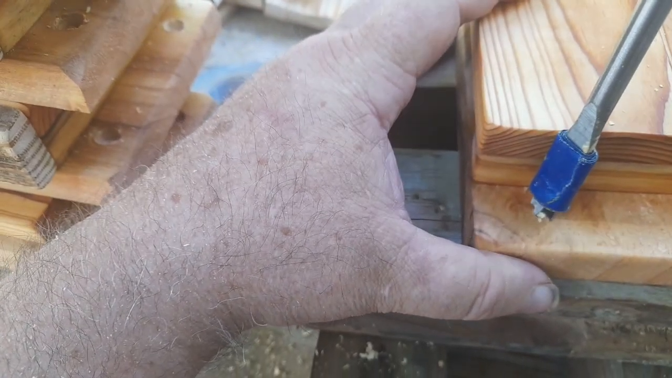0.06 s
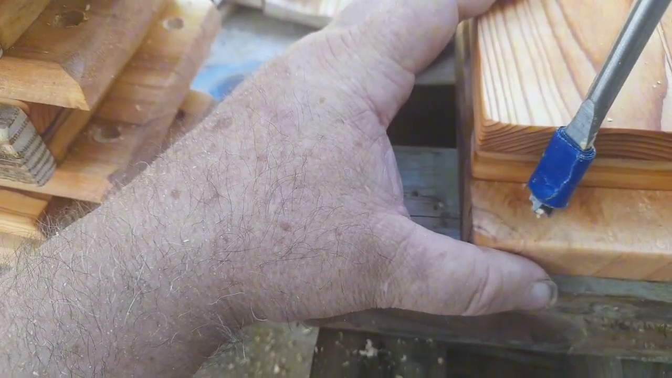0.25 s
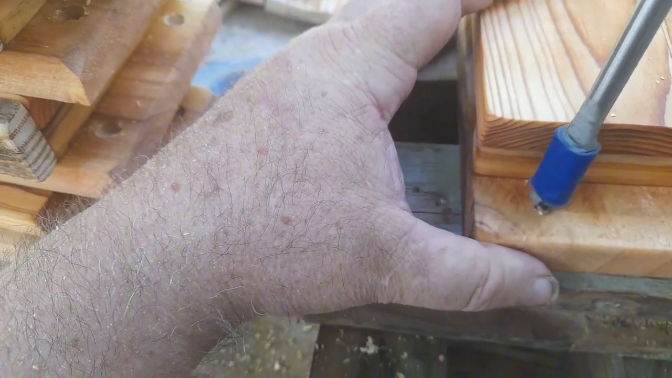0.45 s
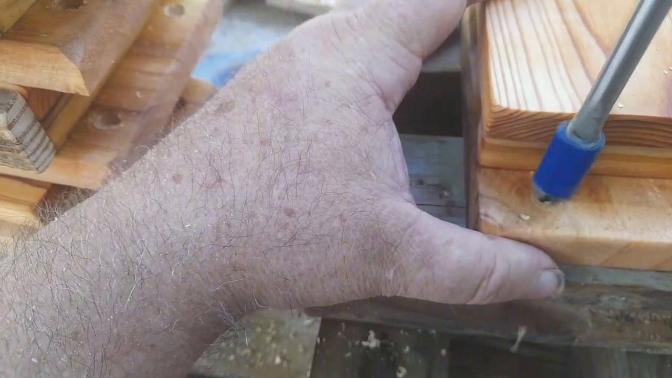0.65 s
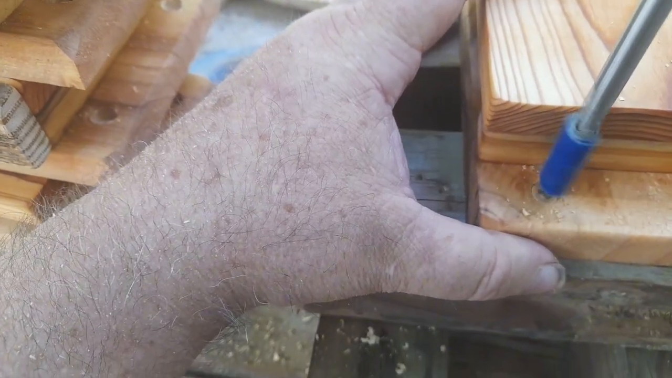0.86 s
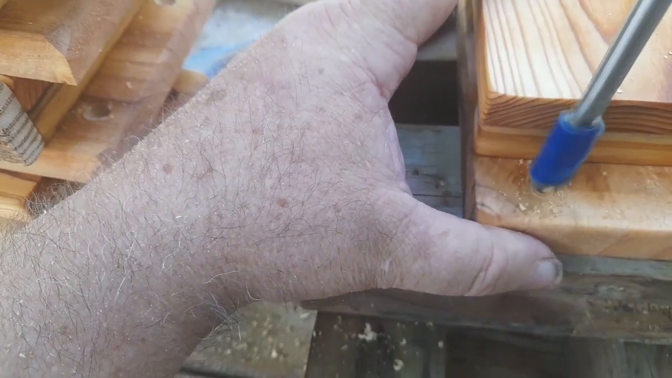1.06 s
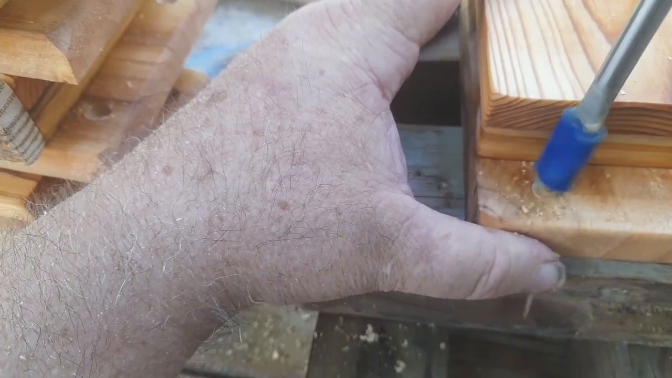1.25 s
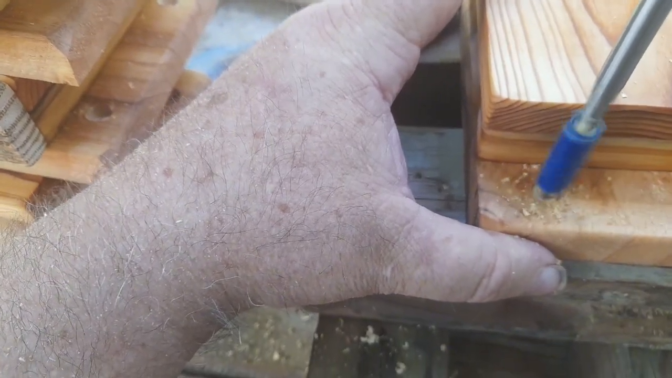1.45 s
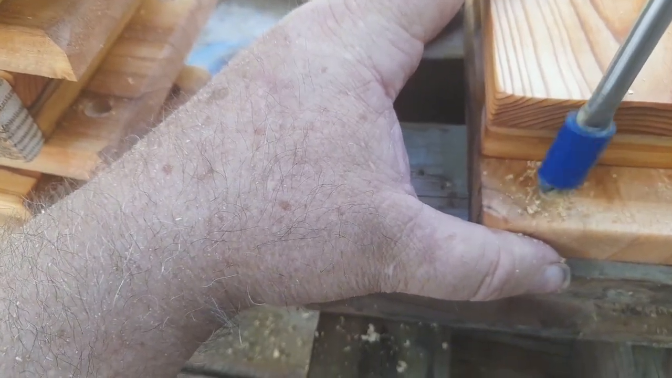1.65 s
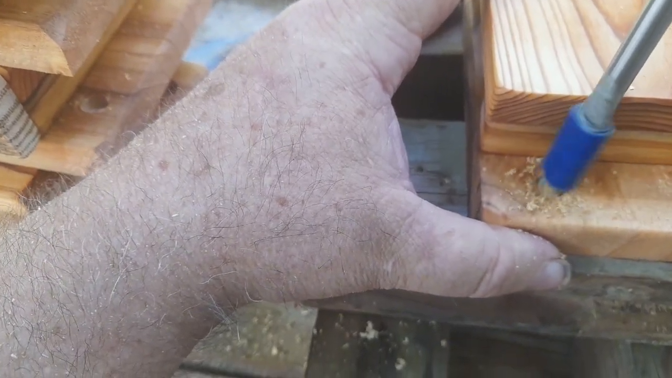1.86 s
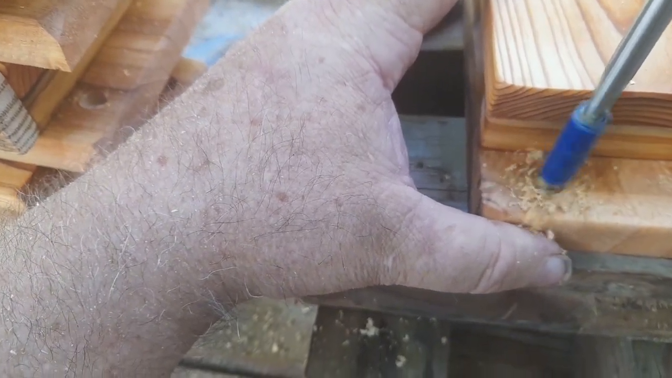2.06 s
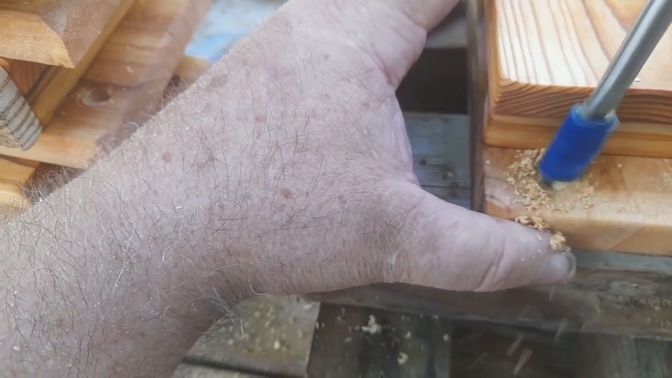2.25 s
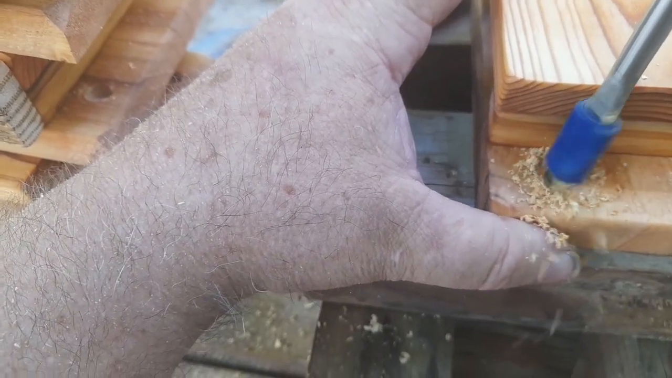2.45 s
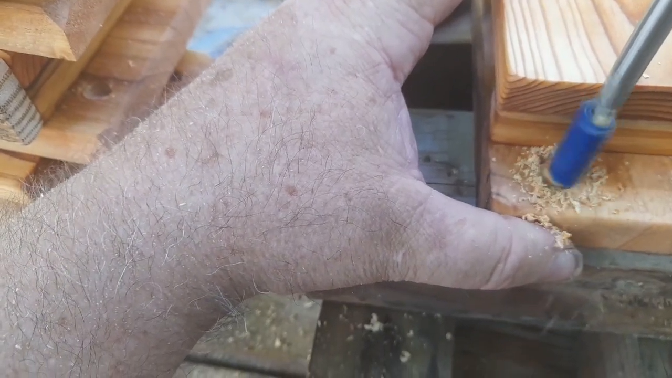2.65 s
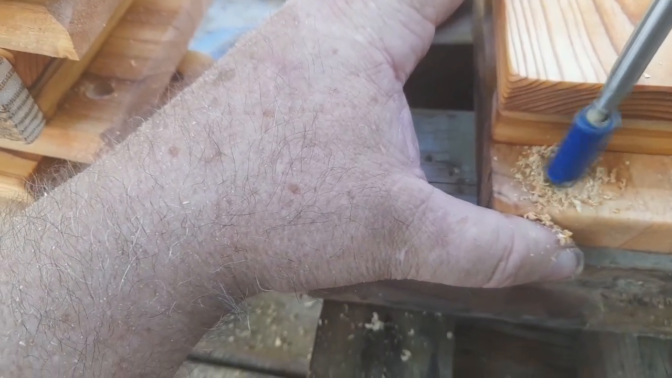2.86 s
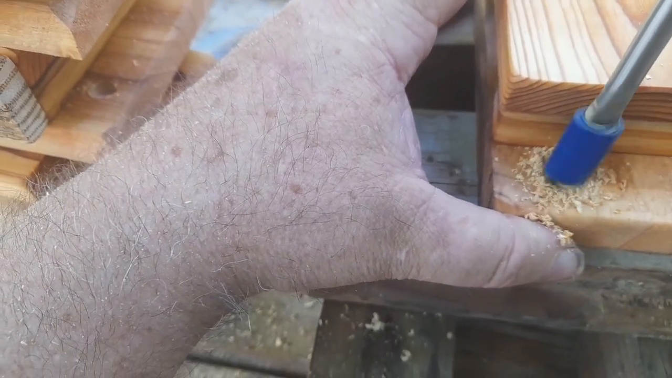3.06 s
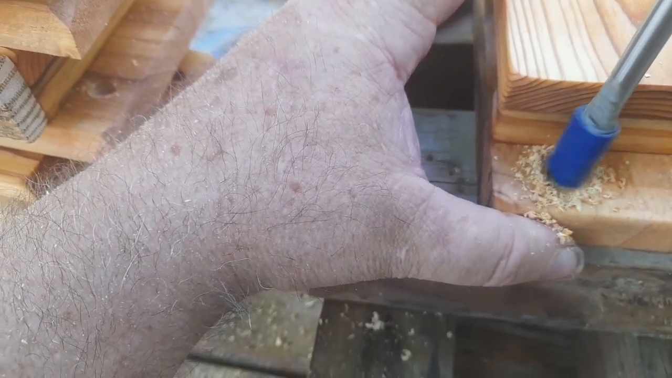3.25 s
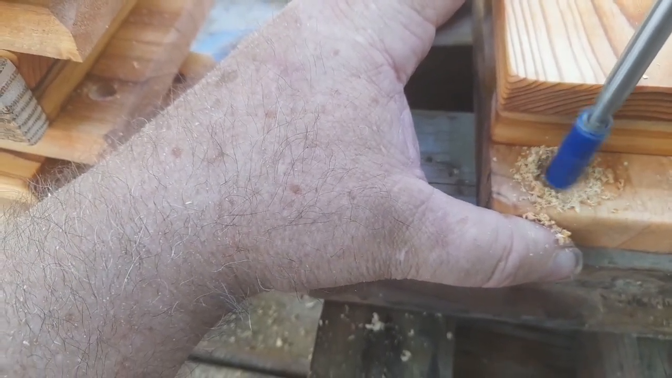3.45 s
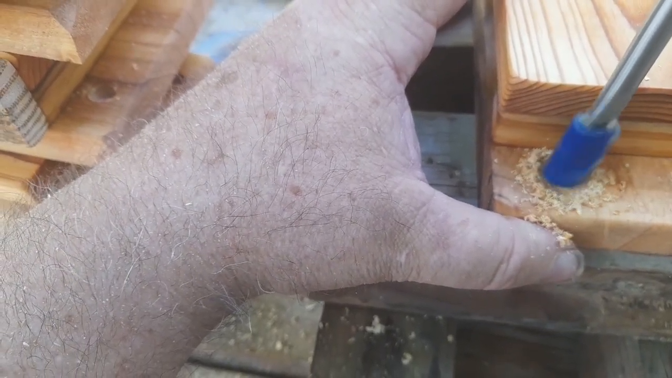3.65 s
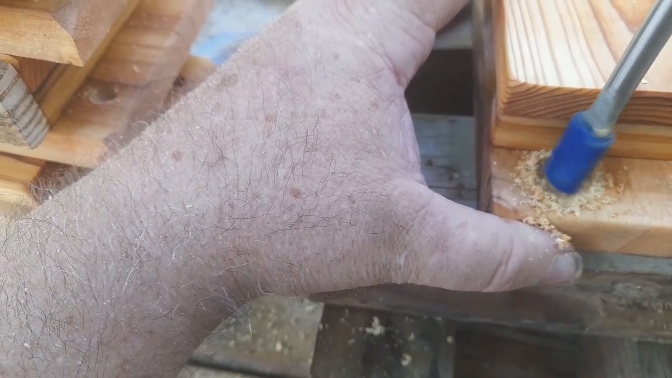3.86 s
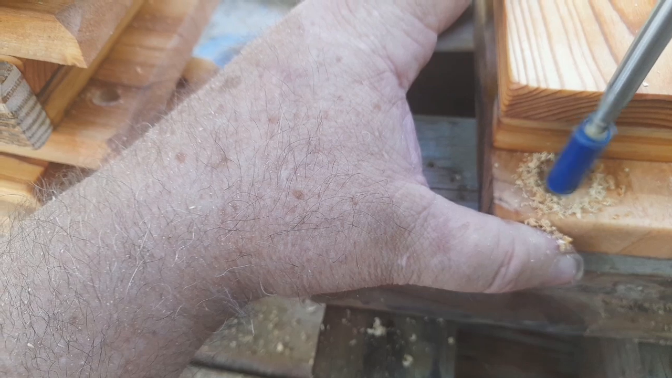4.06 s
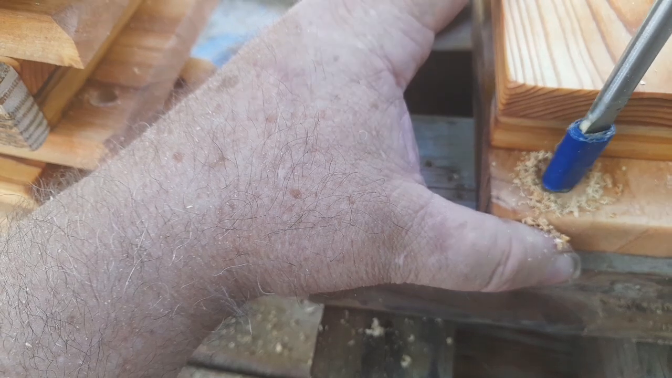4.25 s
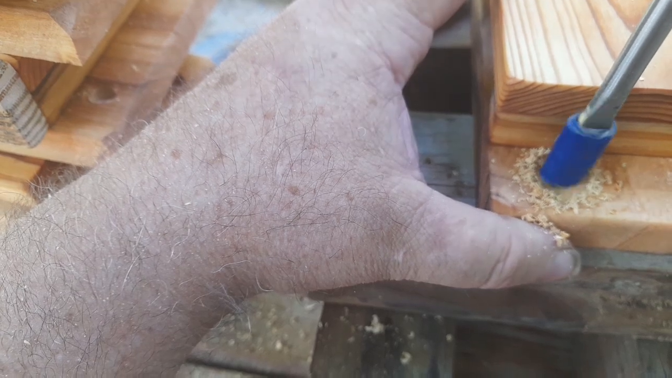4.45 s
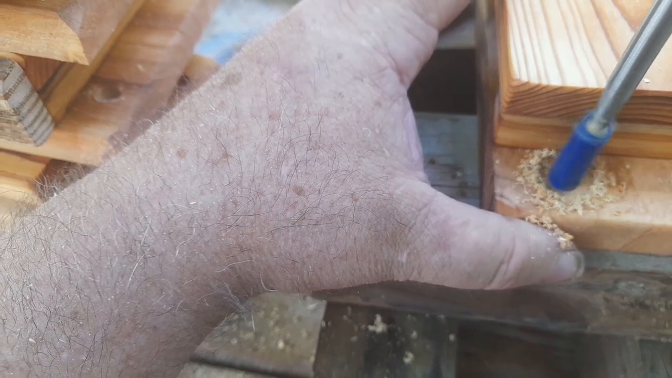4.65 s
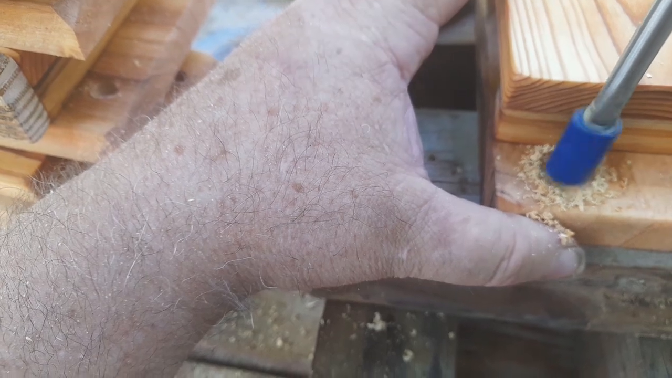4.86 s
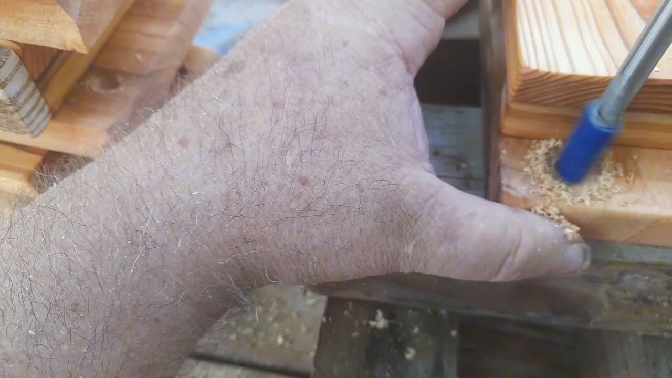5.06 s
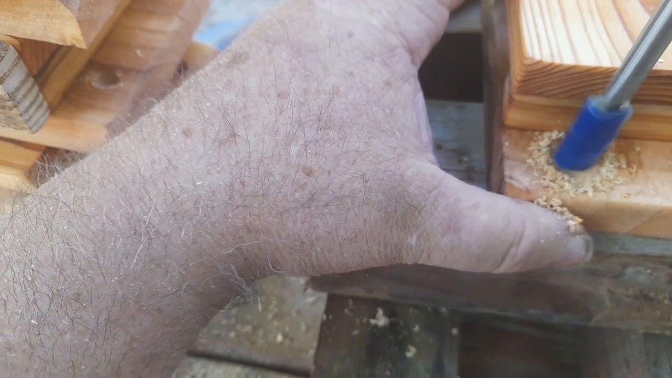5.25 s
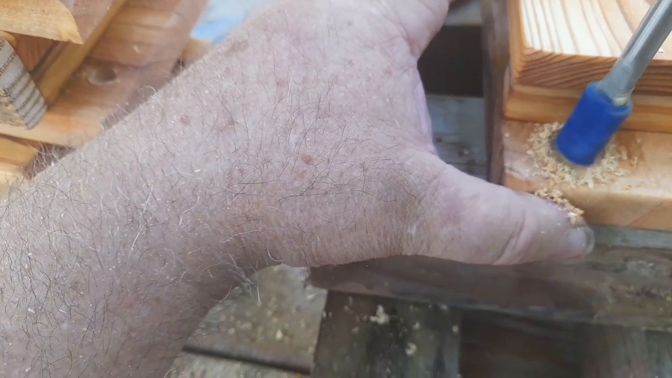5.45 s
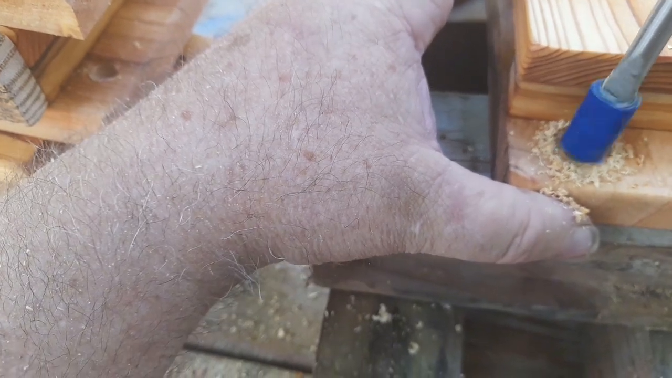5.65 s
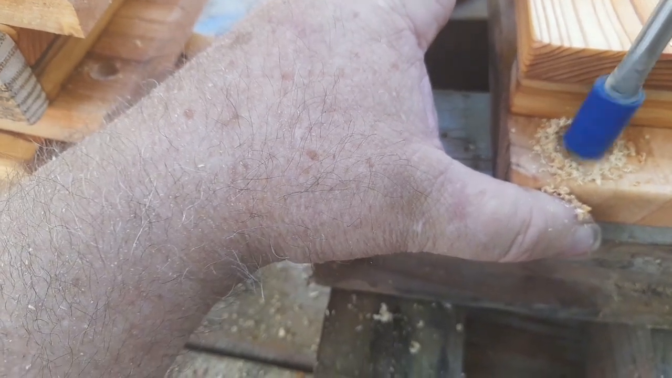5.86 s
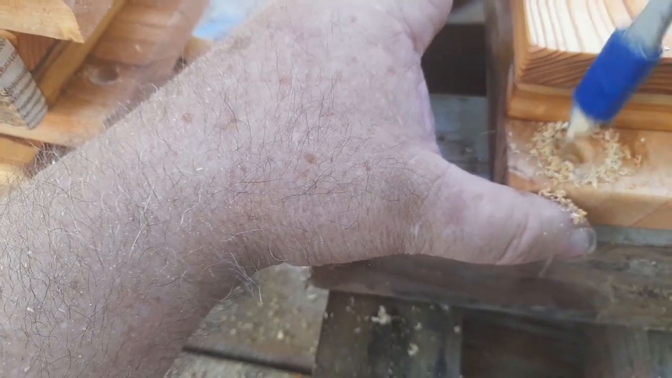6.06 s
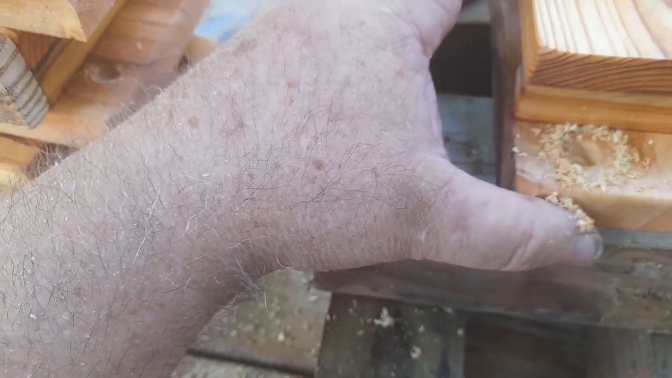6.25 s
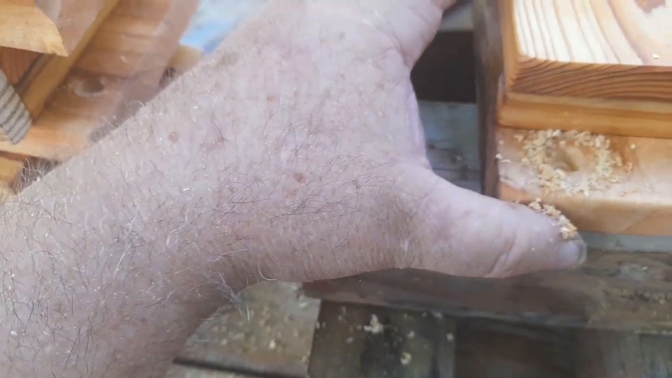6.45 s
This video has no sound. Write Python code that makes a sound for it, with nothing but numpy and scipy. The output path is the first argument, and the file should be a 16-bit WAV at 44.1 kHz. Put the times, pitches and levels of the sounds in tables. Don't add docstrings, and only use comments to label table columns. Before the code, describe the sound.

Close stereo microphone outdoors, low distant background. A brief rooster call comes first, then a handheld drill bores into a small wooden box: a rapid rise to a gritty, buzzing whir, held long with small wavering under load, then an abrupt braked stop. Small plastic clicks lead to two shorter bursts, the last very short, finished by a hard snap and a fainter click as the yard's soft rumble returns.

```python
import sys
import numpy as np
from scipy import signal
from scipy.fft import rfft, irfft
from scipy.io import wavfile
from scipy.ndimage import uniform_filter1d

SR = 44100
rng = np.random.default_rng(int(sys.argv[2]) if len(sys.argv) > 2 else 0)


def makeup_ratio(level_db):
    decades = np.asarray(level_db, float) / 20
    return 10 ** decades


def pcm_store(signal):
    levels = np.round(np.clip(np.atleast_2d(signal), -1, 1) * 32767)
    wavfile.write(sys.argv[1], SR, levels.astype(np.int16).T)


N = 287091
T = np.arange(N) / SR
HZ = np.maximum(np.fft.rfftfreq(N, 1 / SR), 1)
GEAR_RATIO = 36
TEETH_PER_TURN = 5 / 4


def rms_one(x):
    return x / np.sqrt(np.mean(x ** 2) + 1e-20)


def in_time(rows, **ends):
    s, *columns = np.transpose(rows)
    return np.array([np.interp(T, s, column, **ends) for column in columns])


def at_hz(points, **ends):
    hz, value = np.transpose(points)
    return np.interp(np.log(HZ), np.log(hz), value, **ends)


def drift(rate_hz):
    spectrum = rfft(rng.standard_normal(N)) / (1 + (HZ / rate_hz) ** 2)
    return rms_one(irfft(spectrum, N))


def resonances(modes):
    power = 0
    for hz, width, db in modes:
        power = power + makeup_ratio(db) ** 2 / (1 + ((HZ - hz) * 2 / width) ** 2)
    return np.sqrt(power)


def ports(shared, apart, colour=1):
    # f/Hz, likeness [0-1]
    likeness = [(60, 0.61), (130, 0.75), (290, 0.96), (640, 0.56), (1410, 0.38), (3100, 0.28), (6820, 0.1),
                (15000, 0.03)]
    # f/Hz, left minus right/dB
    lean = [(60, -4), (130, -0.5), (290, -2.0), (640, 2), (1410, -5), (3100, -0.5), (6820, -3.5),
            (15000, -3)]
    # f/Hz, lead/rad
    lead = [(0, 0), (1460, 0.08), (3100, -0.17), (4910, 5.5), (6200, 6), (6800, 7), (9220, 10),
            (12300, 5.5), (13300, 6.5), (16600, 4)]
    alike = np.clip(at_hz(likeness), 0, 1)
    mid = np.sqrt(1 + alike) * rfft(shared)
    side = np.sqrt(1 - alike) * rfft(apart)
    tilt = makeup_ratio(at_hz(lean) / 2) * np.exp(.5j * at_hz(lead))
    left, right = (mid + side) * tilt, (mid - side) / tilt
    return irfft(colour * np.array([left, right]), N)


def hiss(colour, pulse=1):
    out = ports(pulse * rng.standard_normal(N), pulse * rng.standard_normal(N), colour)
    return out / np.sqrt(np.mean(out.mean(axis=0) ** 2))


def yard():
    # f/Hz, density/dB per Hz
    yard_colour = [(15, -46.5), (25, -20), (92, -8.5), (344, 0.5), (624, -8), (863, -20), (1290, -19.5),
                   (1890, -13.5), (2280, -17), (3920, -22.5), (7710, -20), (8830, -32), (16000, -29.5)]
    # t/s, level/dB
    floor_level = [(0, -51.5), (.2, -54.5), (.4, -52.5), (4.3, -64.5), (4.4, -65.5), (4.5, -59),
                   (5.6, -59.5), (6.2, -52), (6.3, -57), (6.51, -50.5)]
    level_db = in_time(floor_level)[0] + 1.5 * drift(8)
    return makeup_ratio(level_db) * hiss(makeup_ratio(at_hz(yard_colour)))


def cockerel():
    # t/s, pitch f/Hz, level/dB, roughness [0-1]
    crow = [(0, 777, -50.5, 0.25), (.05, 765, -45, 0.19), (.1, 755, -43.5, 0), (.17, 746, -36, 0),
            (.21, 732, -39, 0.01), (.255, 741, -40, 0.1), (.275, 640, -49.5, .4), (.31, 619, -54, .8),
            (.36, 650, -51, .7), (.4, 730, -42, 0.4), (.46, 740, -49, .3), (.5, 740, -70, .3)]
    # multiple of the pitch, level/dB
    harmonics = [(1, -4), (2, 1), (3, -29.5), (4, -33), (6, -36), (8, -39), (9, -23.5), (10, -33),
                 (13, -31)]
    pitch_hz, level_db, rough = in_time(crow)
    jitter = .004 * drift(40) + .09 * rough * drift(120)
    phase = 2 * np.pi * np.cumsum(pitch_hz * (1 + jitter)) / SR
    voice = sum(makeup_ratio(db) * np.sin(k * phase) for k, db in harmonics)
    voice = voice * makeup_ratio(level_db + 1.2 * drift(25)) * (1 + rough * drift(150))
    voice = voice * (T < crow[-1][0])
    for lag_s, db in [(.023, -15), (.047, -13), (.081, -12)]:
        voice = voice + makeup_ratio(db) * np.interp(T - lag_s, T, voice, left=0)
    return ports(voice, np.roll(voice, 31)) * makeup_ratio(-2.0)


def ring(at_s, db, hz, t60):
    age = np.maximum(T - at_s, 0)
    return makeup_ratio(db - 60 * age / t60) * (T >= at_s) * np.sin(2 * np.pi * hz * age)


def trigger():
    # t/s, peak level/dB, ring f/Hz, t60/s
    clicks = [(0.4189, -18, 2920, 0.02), (4.4634, -47, 2220, 0.02), (4.4767, -43, 2850, 0.02),
              (4.4842, -40, 2830, 0.02), (4.513, -28, 3400, 0.02), (5.66, -35, 2730, 0.02),
              (5.6664, -34, 2920, 0.02), (5.6957, -18, 2330, 0.02), (6.129, -5.5, 3470, 0.02),
              (6.2248, -37, 2950, 0.02), (6.241, -41, 6100, 0.02)]
    # t/s, level/dB, f/Hz, t60/s
    switch_whine = (2, -46.5, 15400, .12)
    out = ring(*switch_whine) * (1 + .5 * drift(300))
    crack = signal.lfilter([1, -.7], [1], rng.standard_normal(N))
    for s, db, hz, t60 in clicks:
        out += ring(s, db - 4.5, hz, t60)
        out += ring(s, db - 14, hz * 0.565, t60)
        out += ring(s, db - 9, hz * 1.9, t60 * 0.73)
        age = np.maximum(T - s, 0)
        out += crack * makeup_ratio(db - 17 - 60 * age / (t60 * .6)) * (T >= s)
    return ports(out, np.roll(out, 23)) * makeup_ratio(-4.5)


def motor_tones(turn, hum_db, fan_db):
    rotor = makeup_ratio(hum_db + .8 * drift(23)) * np.sin(turn)
    fan = makeup_ratio(fan_db + 1.4 * drift(16)) * np.sin(5 * turn)
    return np.sqrt(2) * (rotor + fan)


def mesh_tones(turn, gear):
    # multiple of motor turns, level re gearbox/dB
    mesh = [(8 / 36, -31), (14 / 36, -33.5), (7 / 6, -22.5), (5 / 4, -22), (2, -24), (5 / 2, -20),
            (3, -15.5), (15 / 4, -19), (25 / 4, -22), (7, -18), (25, -35), (30, -23.5), (35, -33)]
    flutter = [drift(15), drift(9.9), drift(16)]
    tones = np.zeros(N)
    for k, (multiple, db) in enumerate(mesh):
        level = gear * makeup_ratio(db + 3.14 * flutter[k % 3])
        tones += level * np.sqrt(2) * np.sin(multiple * turn + k * k)
    return tones


def per_turn(chuck, width_deg, spread_db):
    pattern = rms_one(uniform_filter1d(rng.standard_normal(360), width_deg, mode="wrap"))
    return makeup_ratio(spread_db * np.interp(chuck % 1 * 360, np.arange(360), pattern, period=360))


def gearbox(turn, chuck, grit):
    # f/Hz, density/dB per Hz
    rattle_colour = [(850, -4.5), (1000, 1), (3500, 0), (3900, -7.5)]
    # f/Hz, width/Hz, level/dB
    case = [(1080, 190, -1.5), (1380, 230, 2.5), (1900, 290, -1.5), (2393, 315, 2.5), (3026, 380, 1.5),
            (3447, 290, 0)]
    teeth = 1 + 0.31 * np.cos(turn * TEETH_PER_TURN)
    colour = makeup_ratio(at_hz(rattle_colour, left=-34, right=-37)) * resonances(case)
    return hiss(colour, teeth * grit * per_turn(chuck, 25, 0.64))


def cooling_air(turn, chuck, grit):
    # f/Hz, density/dB per Hz
    air_colour = [(2120, -29), (3600, -3.5), (3810, -1), (5370, -0.5), (6230, -2.5), (7020, 1), (7330, -4),
                  (8050, -19), (10700, -12.5), (12500, -9.5), (15100, -12.5), (16000, -37)]
    teeth = 1 + 0.2 * np.cos(turn * TEETH_PER_TURN)
    planets = 1 + 0.12 * np.cos(turn / 12)
    return hiss(makeup_ratio(at_hz(air_colour)), teeth * planets * grit * per_turn(chuck, 40, 0.75))


def box_walls(chuck):
    # f/Hz, density/dB per Hz
    wall_colour = [(200, -17.5), (300, -9), (450, 3), (520, 0.5), (620, 1), (780, -7), (900, -4.5),
                   (1000, -9)]
    return hiss(makeup_ratio(at_hz(wall_colour, left=-40, right=-32)), per_turn(chuck, 12, 2.2))


def bit_thud(chuck):
    # f/Hz, density/dB per Hz
    thud_colour = [(15, -52), (25, -28), (75, 3.5), (151, 1), (178, -2.5), (227, -10), (273, 1), (300, 3),
                   (390, -28), (660, -120)]
    return hiss(makeup_ratio(at_hz(thud_colour)), per_turn(chuck, 15, 4.2))


def drill():
    # t/s, turns f/Hz, rotor hum level/dB, fan tone level/dB
    motor = [(.42, 59.88, -63, -62.5), (.5, 215.2, -49, -44), (.56, 290, -45.5, -44),
             (.62, 346.6, -32.5, -32), (.7, 379.5, -27.5, -30), (0.78, 393.5, -30, -34),
             (0.9, 397.2, -33.5, -34), (1.0, 396.7, -34, -43), (1.14, 396.2, -32, -28),
             (1.19, 396, -30.5, -38), (1.52, 394, -32, -37), (2.24, 386.3, -30, -31),
             (2.43, 387, -30.5, -35), (2.68, 383.2, -32.5, -29), (2.9, 383, -30, -32.5),
             (3.42, 384.8, -32, -33), (3.73, 392.3, -32, -36.5), (4.14, 394.8, -32, -33.5),
             (4.16, 394.2, -30, -36), (4.2, 375, -27, -34), (4.25, 299.7, -61, -47), (4.31, 60, -74, -67),
             (4.51, 59.9, -71.5, -66), (4.57, 250, -55, -43), (4.63, 340, -45, -36), (4.69, 379, -27, -34),
             (4.76, 392.4, -30, -36), (4.916, 395.9, -35.5, -35), (4.952, 396.4, -36, -45),
             (5.004, 397.7, -32, -40), (5.4, 396.7, -38, -40), (5.53, 398.2, -48, -48),
             (5.57, 299.6, -46, -50), (5.62, 60.04, -70, -70), (5.7, 80.1, -72, -70),
             (5.76, 269.5, -45, -44), (5.84, 359.6, -47, -51), (5.95, 394.4, -39.5, -42),
             (6.08, 399.6, -38.5, -46), (6.11, 300.3, -51, -50), (6.17, 60, -70, -70)]
    # cooling air/dB, box walls/dB, bit thud/dB
    bursts = [
        [(0.42, -26, -9.5, -0.5, -25), (0.44, -35, -3, -4, -14), (0.45, -26.5, -2.5, -13, -21),
         (0.48, -20.5, -3.5, -13, -30), (0.55, -22, -2.5, -12, -17), (0.59, -20.5, -3.5, -10.5, -22),
         (0.72, -22, -3, -12.5, -23), (1.1, -24, -3, -11, -18.5), (1.14, -22.5, -3.5, -11.5, -20),
         (1.25, -23, -2, -11.5, -19), (1.28, -23.5, -5.5, -8.5, -26), (1.34, -23, -1.5, -10.5, -14),
         (1.38, -24.5, -3.5, -11.5, -22), (1.41, -22, -3, -12, -20), (1.44, -24, -3.5, -8, -16),
         (1.48, -23, -2.5, -8.5, -25), (1.53, -22, -3.5, -11.5, -18), (1.72, -24, -2, -11.5, -20),
         (1.76, -25, -1.5, -6, -22), (1.81, -24, -3.5, -15, -16), (1.82, -25, 0, -8.5, -16),
         (1.93, -23.5, -2.5, -12.5, -18.5), (2.31, -24, -2, -12.5, -15), (2.96, -23.5, -1.5, -10.5, -19),
         (3.0, -25.5, -1, -11.5, -12), (3.03, -23, -3, -12.5, -23), (3.24, -23.5, -2.5, -12, -20),
         (3.28, -22.5, -3, -9.5, -18), (3.32, -23.5, -2.5, -12, -20), (4.1, -24.5, -3, -9.5, -23),
         (4.12, -26, -1, -4.5, -19), (4.13, -21, -2.5, -19, -24), (4.14, -27, -1, -12.5, -21),
         (4.17, -24, -3.5, -11, -29), (4.2, -25, -2, -13.5, -22), (4.23, -22, -4.5, -9, -21),
         (4.26, -36, -9, -4, -18), (4.3, -46, -11, -15, -14), (4.33, -81, -4, -3, 5)],
        [(4.511, -50, -1.5, -8, -6), (4.531, -33, -1, -9, -26), (4.563, -24, -7.5, -20.5, -22),
         (4.585, -26.5, -6, -14, -22), (4.645, -23.5, -3, -12.5, -21), (4.995, -23.5, -4, -11.5, -18),
         (5.033, -25.5, -1, -8.5, -14), (5.077, -25, -3.5, -10.5, -16.5), (5.381, -23, -4, -10, -30),
         (5.515, -26.5, -1.5, -13, -23), (5.559, -23.5, -5.5, -10, -29), (5.593, -34.5, -8, -4, -18),
         (5.615, -50.5, -10, -19, -8), (5.635, -73, -3, -4, 12)],
        [(5.695, -35.5, -0.5, -11.5, -27), (5.753, -27.5, -4.5, -16, -25), (5.819, -28, -1, -12.5, -32),
         (6.039, -26, -3, -11.5, -24), (6.103, -25.5, -4.5, -16, -25), (6.135, -27, -7, -7, -21),
         (6.181, -60, -4, -11, 3), (6.19, -74, -6, 10, 18)],
    ]
    turns_hz, hum_db, fan_db = in_time(motor)
    turn = 2 * np.pi * np.cumsum(turns_hz * (1 + .0015 * drift(5.94))) / SR
    chuck = turn / (2 * np.pi * GEAR_RATIO)
    gear, air, walls, thud = np.zeros((4, N))
    for rows in bursts:
        gear_db, air_db, walls_db, thud_db = in_time(rows, left=-150, right=-150)
        gear += makeup_ratio(gear_db)
        air += makeup_ratio(gear_db + air_db)
        walls += makeup_ratio(gear_db + walls_db)
        thud += makeup_ratio(gear_db + thud_db)
    running = gear > 1e-6
    tones = motor_tones(turn, hum_db, fan_db) * running + mesh_tones(turn, gear)
    out = ports(tones, np.roll(tones, 37)) * makeup_ratio(-2.5)
    grit = makeup_ratio(1.92 * drift(990) + 0.65 * drift(34))
    out += makeup_ratio(0.39) * gear * gearbox(turn, chuck, grit)
    out += air * cooling_air(turn, chuck, grit)
    out += makeup_ratio(1.0) * walls * box_walls(chuck)
    out += thud * bit_thud(chuck)
    return out


def scene():
    return yard() + cockerel() + trigger() + drill()


def band_limit(x):
    return signal.sosfilt(signal.butter(12, 17010, fs=SR, output="sos"), x)


def record(dry):
    return band_limit(dry)


dry = scene()
out = record(dry)
pcm_store(out)
```